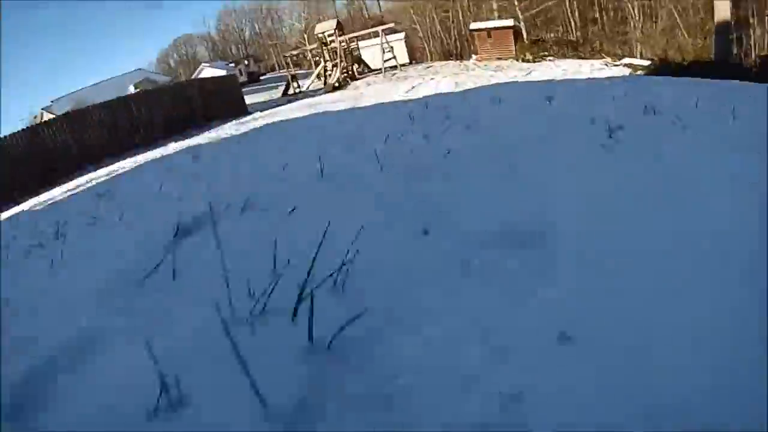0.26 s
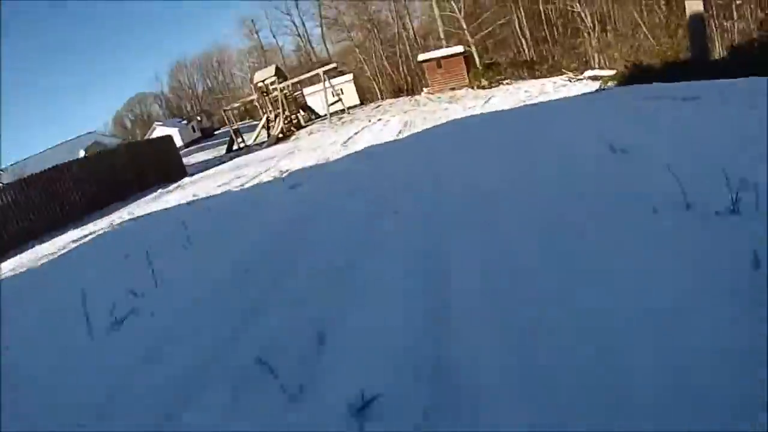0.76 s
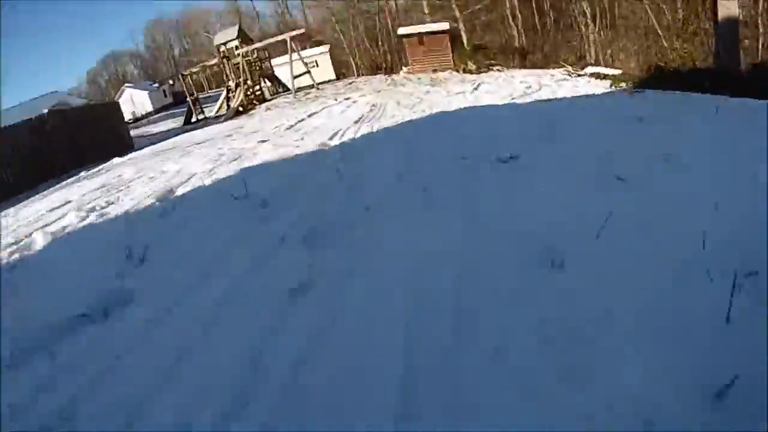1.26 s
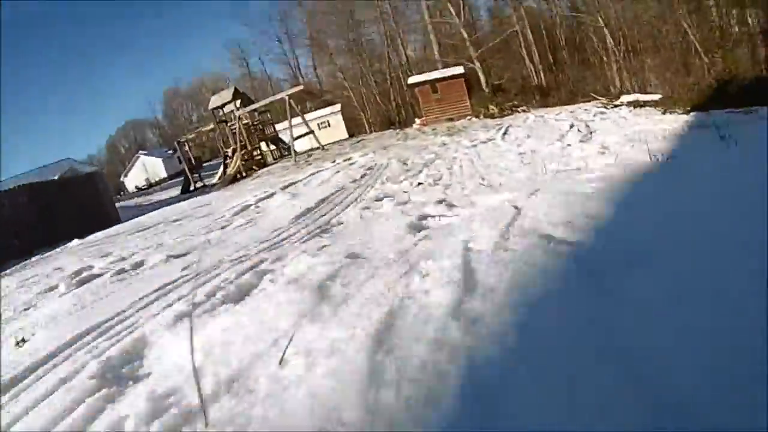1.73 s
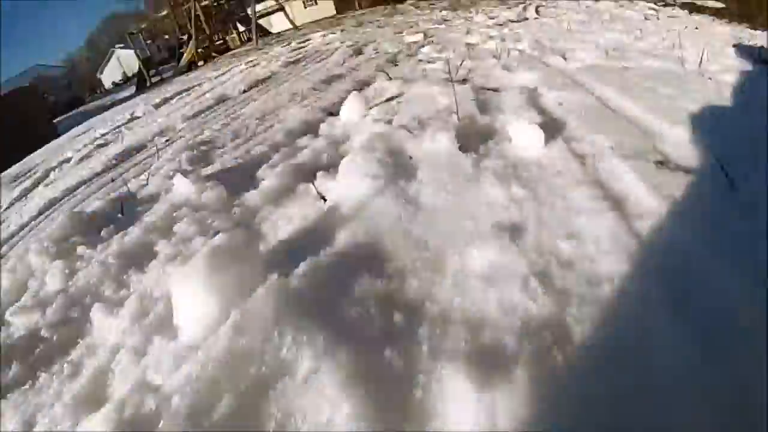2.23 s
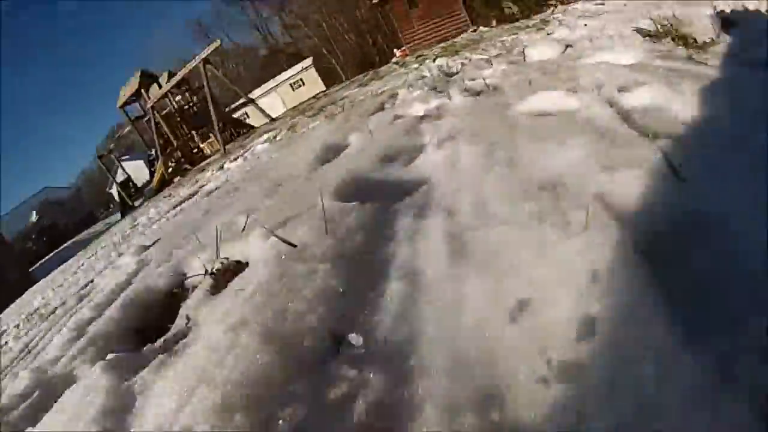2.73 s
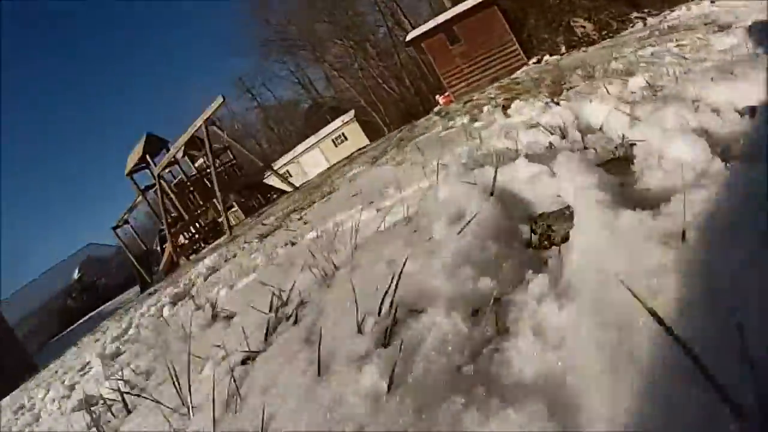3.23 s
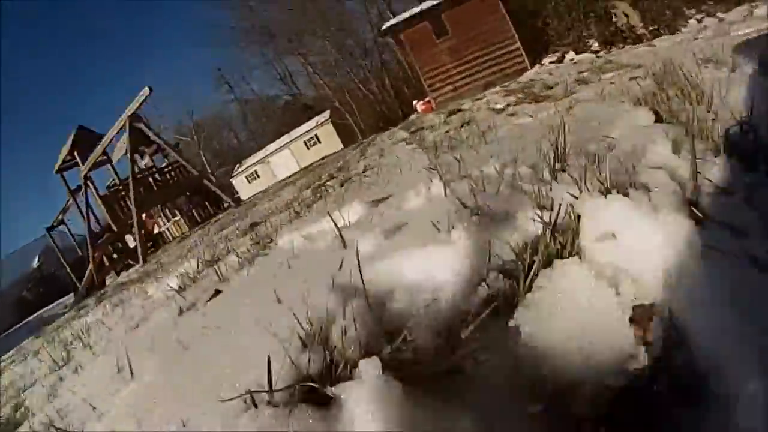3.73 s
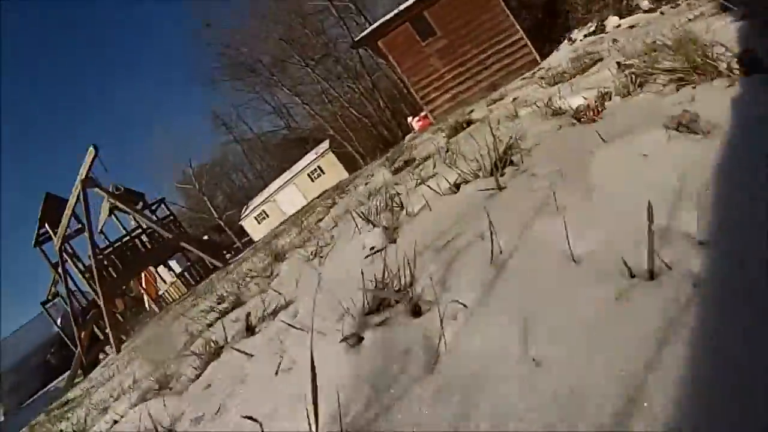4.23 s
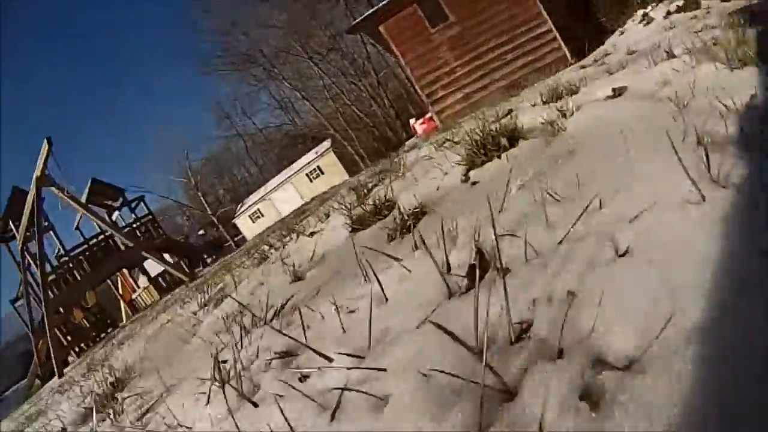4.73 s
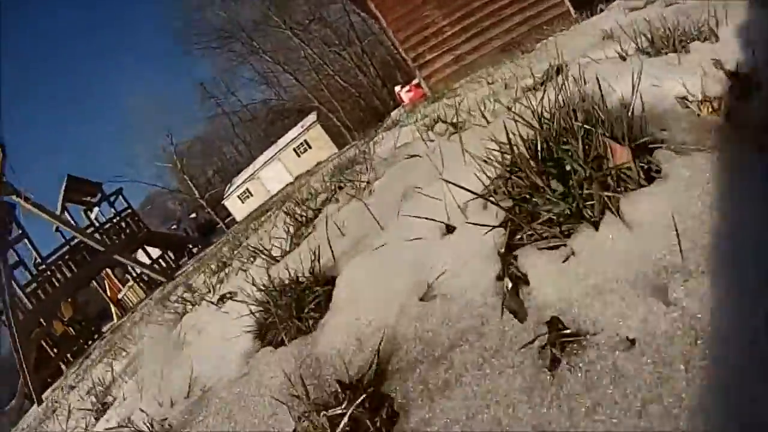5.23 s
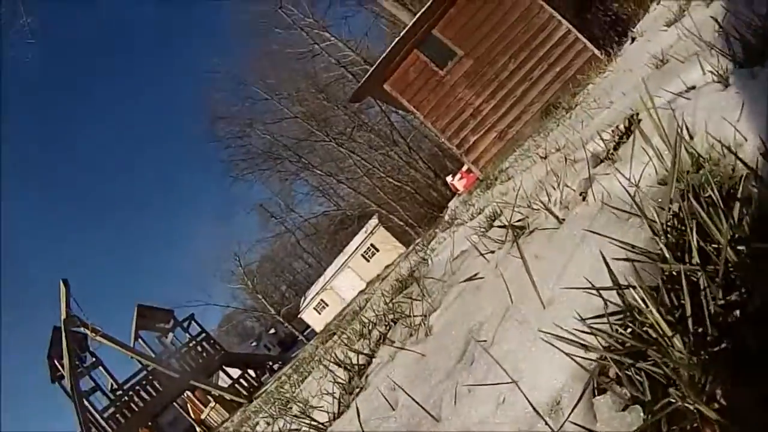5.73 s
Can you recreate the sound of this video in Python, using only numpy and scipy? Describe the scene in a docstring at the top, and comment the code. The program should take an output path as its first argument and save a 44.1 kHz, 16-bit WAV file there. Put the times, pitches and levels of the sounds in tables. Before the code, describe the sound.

A plastic sled grinds over crusty snow with gritty scraping, hollow knocks, crunches and low wind buffeting close to a riding microphone.

```python
"""A plastic sled hull grinds over crusty snow, with a microphone in a small case riding along.
Random ice-grain impacts, shaped by resonances and filters, make the scrape, hiss, drag and crunches.
Clicks sent through the ringing of the case make knocks and the ticks of thrown snow.
Damped swings make bumps; filtered jolts make the low rumble, and filtered noise makes the wind."""
import sys
import numpy as np
from scipy import signal
from scipy.fft import rfft, irfft
from scipy.io import wavfile
from scipy.ndimage import uniform_filter1d

SR = 44100
rng = np.random.default_rng(int(sys.argv[2]) if len(sys.argv) > 2 else 0)


def pcm_store(signal):
    """Save signal as 16-bit PCM."""
    levels = np.round(np.clip(np.atleast_2d(signal), -1, 1) * 32767)
    wavfile.write(sys.argv[1], SR, levels.astype(np.int16).T)


N = 263718
TIME = np.arange(N) / SR

# ringing of the case, lower notes: pitch_hz, width_hz, level_db
CASE_RINGING = [(1476, 270, -0.5), (1781, 320, -1.5), (2103, 270, -1), (2322, 410, -7.5), (2760, 410, -1.5),
                (2930, 270, -5)]
# ringing of the case, upper notes: pitch_hz, width_hz, level_db
UPPER_RINGING = [(3105, 146, 7.5), (3574, 133, 4), (3650, 1190, 2.5), (4920, 1000, -3.5), (5050, 470, -6),
                 (6420, 900, -2), (7650, 385, 1.5), (8110, 390, -0.5), (9070, 500, -5), (10630, 330, -5),
                 (11900, 900, -15)]
# tone colour of fine powder, also used for the fine top of ticks: pitch_hz, level_db
POWDER_COLOUR = [(4000, -37), (8000, -28), (10000, -11), (11300, 4), (12600, 6), (14000, 3), (15500, -5)]
# bumps that thump the hull: start_s, level_db (before the shares of push and swing), pitch_hz,
# swings (number until nearly damped)
HULL_BUMPS = [(0.452, -7, 122, 6.6), (.519, -3.5, 141, 3.7), (0.648, 1, 70, 1.5), (.878, -5, 83, 2.2),
              (1.084, -3.5, 94.5, 4.3), (1.118, -2, 79.5, 2.8), (1.16, -3, 105, 3.3), (1.272, -4, 120, 4.3),
              (1.486, 0, 61.3, 0.99), (1.586, -7, 66, 2), (1.798, 0.5, 98.5, 1.7), (2.091, 0.5, 93, 1.7),
              (2.098, -8, 69.4, 1.5), (2.331, -8.5, 124, 6.3), (3.56, -1, 50, 2.1), (4.587, 0, 68, 2),
              (4.617, 3.5, 114, 2), (4.642, -5, 82.5, 1.8), (4.99, -2, 60, 1.5), (5.042, -3.5, 56, 1.4),
              (5.276, -1, 113, 3.3)]


def from_db(db):
    """Turn decibels into a gain."""
    return 10 ** (np.asarray(db) / 20)


def rms_one(x):
    """Scale a signal to unit power."""
    return x / np.sqrt(np.mean(x ** 2) + 1e-20)


def in_time(rows):
    """Draw one curve per column by joining the timed points with straight lines."""
    s, *columns = np.transpose(rows)
    return [np.interp(TIME, s, column) for column in columns]


def drift(rate):
    """Wander smoothly and randomly with spread 1; a higher rate (per second) changes faster."""
    step = 20  # samples between the points of the slow curve
    warm_up = 2000
    r = np.exp(-2 * np.pi * rate * step / SR)
    noise = rng.standard_normal(N // step + warm_up + 2)
    slow = signal.lfilter([1], [1, -2 * r, r * r], noise)[warm_up:]
    return np.interp(np.arange(N) / step, np.arange(len(slow)), rms_one(slow))


def cut(x, hz, kind, order=2):
    """Keep what lies above ("high") or below ("low") a pitch, with a Butterworth filter."""
    sections = signal.butter(order, min(hz, .45 * SR), kind, fs=SR, output="sos")
    return signal.sosfilt(sections, x)


def colour(spectrum, size=8192):
    """Make the earliest-sounding (minimum-phase) impulse response with the given spectrum."""
    hz, db = np.transpose(spectrum)
    grid = np.maximum(np.arange(size // 2 + 1) * SR / size, 1)
    gain = from_db(np.interp(np.log(grid), np.log(hz), db))
    cepstrum = irfft(np.log(gain))
    # folding the second half onto the first leaves nothing before time zero
    cepstrum[1:size // 2] *= 2
    cepstrum[size // 2 + 1:] = 0
    return irfft(np.exp(rfft(cepstrum)))


def resonances(modes, size=2048):
    """Add up decaying ringing notes with alternating signs; wider notes die sooner."""
    out = np.zeros(size)
    for k, (hz, width, db) in enumerate(modes):
        r = np.exp(-np.pi * width / SR)
        poles = [1, -2 * r * np.cos(2 * np.pi * hz / SR), r * r]
        ring = signal.lfilter([1, 0, -1], poles, signal.unit_impulse(size))
        out += (-1) ** k * from_db(db) * (1 - r * r) / 2 * ring
    return out


def through(force, response):
    """Drive a body with a force; white noise keeps its power."""
    return signal.oaconvolve(force, response / np.linalg.norm(response))[:N]


def grains(per_s, spread_db):
    """Scatter tiny impacts of uneven size and either sign, at unit power."""
    sizes = from_db(spread_db * np.minimum(rng.exponential(1, N), 4))
    sizes = sizes * rng.choice([-1, 1], N)
    return rms_one(sizes * (rng.random(N) < per_s / SR))


def evened(x, span_s):
    """Hold the power steady over a span, keeping the faster grain."""
    power = uniform_filter1d(x * x, max(int(span_s * SR), 2))
    return x / np.sqrt(np.abs(power) + 1e-9)


def strikes(times, levels_db, response, rattle, rattle_s):
    """Strike a body with clicks that peak at the given levels, each with a fading noisy rattle."""
    t = np.arange(SR // 20) / SR
    force = np.zeros(N + SR)
    for s, db in zip(times, levels_db):
        at = int(s * SR)
        rattling = rattle * rng.standard_normal(len(t)) * np.exp(-t / rattle_s)
        force[at:at + len(t)] += from_db(db) * (rattling + (t == 0))
    return signal.oaconvolve(force[:N], response / np.abs(response).max())[:N]


def wandering(force, modes, wander_db):
    """Drive each mode now more, now less, as the contact moves over the hull."""
    out = np.zeros(N)
    for k, mode in enumerate(modes):
        ring = signal.oaconvolve(force, resonances([mode]))[:N]
        out += (-1) ** k * from_db(wander_db * drift(12.2)) * ring
    return out


def case_band(x):
    """Let through the steep-edged band of pitches that the case passes."""
    return cut(cut(x, 1726, "high", order=3), 2690, "low", order=6)


def swells(rows, edge_s):
    """Make each row rise, hold and fall; one curve per column after start and length."""
    out = 0
    for start, length, *heights in rows:
        inside = np.minimum(TIME - start, start + length - TIME)
        edge = max(min(edge_s, length / 2), .001)
        out = out + np.outer(heights, np.clip(inside / edge, 0, 1))
    return out


def ride():
    """Share the hull's pressure among the layers by ground, altered on mounds and lost in skips."""
    # how hard the hull bears on the snow: start_s, level_db
    pressure_points = [(0, -21.5), (.2, -23), (.32, -29), (.46, -24), (.94, -22), (1.02, -27), (2.16, -30),
                       (2.28, -25), (2.7, -19), (2.86, -26.5), (3.45, -24.5), (4.6, -23.5), (4.76, -30),
                       (5.22, -26.5), (5.38, -24.5), (5.66, -31), (5.75, -49.5), (5.98, -37)]
    # depth and firmness of the snow, levels relative to the pressure:
    # start_s, loose_hiss_db, ploughing_drag_db, ground_rumble_db
    ground_points = [(0, -20.5, -14, -2), (.75, -18, -13.5, -0.5), (1.15, -19.5, -10.5, 0.5),
                     (1.7, -15.5, -7.5, 6.5), (1.95, -22.5, -10.5, -12.5), (2.22, -12.5, -10.5, 7),
                     (2.6, -18, -15.5, -4), (2.95, -8, -9.5, 2), (3.55, -10.5, -6.5, 2.5),
                     (4.15, -11, -8.5, -3), (4.55, -6.5, -6, -0.5), (4.9, -10.5, -6.5, 3),
                     (5.35, -14.5, -9, -7.5), (5.95, -21.5, -12, -1.5)]
    # airflow over the microphone: start_s, level_db
    airflow_points = [(0, -16.5), (.3, -19.5), (.6, -17.5), (1.7, -19), (2.0, -34), (2.2, -21),
                      (2.9, -23.5), (3.4, -24), (3.7, -20), (4.1, -22.5), (4.55, -17.5), (4.85, -28.5),
                      (5.1, -21), (5.98, -30.5)]
    # the hull rides into a mound: start_s, length_s, scrape_change_db, drag_change_db, rumble_change_db
    mound_rows = [(.15, 0.054, 4.5, -1, 5.5), (.45, 0.17, 6, 2.5, 7.5), (.68, 0.036, 5.5, 4, 7),
                  (.815, 0.14, 1.5, 0, 4), (1.07, 0.1, 0, -3, 7), (1.24, 0.055, -4, -12, 5.5),
                  (1.575, .07, 4.5, 9, 4), (1.635, 0.098, 6.5, 4.5, 2), (1.755, 0.042, -2.5, 0, 5),
                  (1.865, 0.036, 6.5, -6, 3), (1.92, 0.042, 8, -4, 7), (2.18, 0.081, 1, 4, 3),
                  (2.26, 0.14, 3.5, 0.5, 2.5), (3.25, 0.14, 1, -0.5, 0.5), (3.41, 0.11, 5.5, 4, 2),
                  (3.9, 0.1, 3, 4.5, 2), (4.24, 0.045, 0.5, 4, 6), (4.57, 0.094, 1, 4.5, 9.5),
                  (4.975, 0.075, 4, 7, 6), (5.275, 0.047, 2, 1.5, -1)]
    # the hull goes light behind a crest: start_s, length_s, contact_loss_db
    skip_rows = [(.97, .09, 3), (1.335, 0.16, 8), (1.808, 0.037, 12), (1.96, 0.16, 3.5), (2.41, 0.067, 5),
                 (3.07, 0.072, 3), (4.08, .13, 2.5), (5.21, 0.057, 5.5)]
    # buffets of wind: start_s, length_s, rise_db
    gust_rows = [(2.075, 0.037, 22), (3.52, .13, 7.5), (4.22, 0.091, 7.5), (5.0, 0.11, 7),
                 (5.39, 0.068, 11)]
    pressure_db, = in_time(pressure_points)
    loose_db, packed_db, firm_db = in_time(ground_points)
    air_db, = in_time(airflow_points)
    bite_db, plough_db, heave_db = swells(mound_rows, edge_s=0.015)
    lift_db, = swells(skip_rows, edge_s=0.028)
    gust_db, = swells(gust_rows, edge_s=0.034)
    scrape_db = pressure_db + bite_db - lift_db
    hiss_db = pressure_db + loose_db + 0.9 * bite_db - 0.77 * lift_db
    drag_db = pressure_db + packed_db + plough_db - .9 * lift_db
    rumble_db = pressure_db + firm_db + heave_db - 1.37 * lift_db
    wind_db = air_db + gust_db - 1.4 * lift_db
    return scrape_db, hiss_db, drag_db, rumble_db, wind_db


def wind(wind_db):
    """Buffet the microphone with low-pitched noise whose strength wanders."""
    # tone colour of the wind: pitch_hz, level_db
    wind_colour = [(8, -18), (22, 5.5), (40, 5.5), (65, 2), (90, -5.5), (140, -28), (400, -36),
                   (1500, -79.5)]
    air = evened(through(rng.standard_normal(N), colour(wind_colour)), 0.073)
    return air * from_db(wind_db + 2.4 * drift(5.4))


def shudder():
    """Give the strength of the shaking that dies away after each bump."""
    decay_s = 0.013
    kicks = np.zeros(N)
    for s, db, *_ in HULL_BUMPS:
        kicks[int(s * SR)] = from_db(db - 14.5)
    return signal.lfilter([1], [1, -np.exp(-1 / (decay_s * SR))], kicks + 1e-18)


def shaking(rumble_db):
    """Rumble the hull with many small ground jolts, plus a clatter that follows the hardness."""
    # tone colour of the rumble: pitch_hz, level_db
    rumble_colour = [(40, -23), (75, -4), (110, 6), (145, 1.5), (200, -5), (260, -8.5), (350, -17.5),
                     (500, -34), (900, -53.5), (2500, -98)]
    # tone colour of the hull clattering over hard ground: pitch_hz, level_db
    clatter_colour = [(130, -22.5), (240, 3), (320, 2.5), (450, -8), (600, -13), (1000, -30.5),
                      (2500, -59.5)]
    # hardness of the ground: start_s, clatter_over_rumble_db
    hardness_points = [(0, -8.5), (.6, -10.5), (1.1, -13.5), (1.7, -11.5), (2.3, -15), (3, -15), (4.6, -15),
                       (5.5, -12)]
    hardness_db, = in_time(hardness_points)
    rumble = evened(through(grains(per_s=450, spread_db=4), colour(rumble_colour)), 0.0693)
    clatter = evened(through(grains(per_s=400, spread_db=3.0), colour(clatter_colour)), 0.088)
    strength = np.hypot(from_db(rumble_db - 0.5 + 2.1 * drift(15)), shudder())
    return (rumble + clatter * from_db(hardness_db)) * strength


def bumps():
    """Push the hull with brief contacts; damped by snow and rider, it swings back a few times."""
    out = np.zeros(N)
    contact_s = 0.0022  # time for the push to reach its peak
    for s, db, hz, swings in HULL_BUMPS:
        at = int(s * SR)
        t = TIME[:min(SR // 5, N - at)]
        contact = t / contact_s * np.exp(1 - t / contact_s)
        age = 5.86 * hz * t / max(swings, .5)
        swing = -np.sin(2 * np.pi * hz * t) * age * np.exp(1 - age)
        out[at:at + len(t)] += from_db(db) * (from_db(-7.5) * contact + from_db(-3.5) * swing)
    return cut(out, 950, "low")


def ticks(snap):
    """Click the case with thrown crumbs, too light to ring its low modes."""
    # single crumbs and stalks: start_s, level_db (before a small trim), fine_top_db (over the click)
    tick_rows = [(1.2637, -16, -3), (1.4872, -27, 12), (2.0928, -23.5, -22), (2.711, -17, -23),
                 (2.9884, -15, -16), (3.039, -19.5, 0), (3.0884, -21, 6), (4.6253, -12.5, -22),
                 (5.6706, -24, -27), (5.6775, -20, -23), (5.685, -24, -30), (5.7287, -22, -23),
                 (5.874, -32.5, -35), (5.9524, -37, -25)]
    # nine crumbs thrown up by the nose, sparser and weaker as they fall
    shower_start_s, shower_length_s = 2.98, .3
    turn, size, top = rng.random(size=(9, 3)).T
    fallen = ((np.arange(len(turn)) + turn) / len(turn)) ** 1.6
    shower_s = shower_start_s + shower_length_s * fallen
    shower_db = -13 - 13 * fallen - 4 * size
    shower_top_db = -4 + 12 * (top - .5)
    shower = np.column_stack([shower_s, shower_db, shower_top_db])
    s, db, top_db = np.vstack([tick_rows, shower]).T
    click = strikes(s, db + .5, snap, rattle=0.057, rattle_s=0.0047)
    fine_top = strikes(s, db + top_db - 1.0, colour(POWDER_COLOUR), rattle=0.19, rattle_s=0.00069)
    return click + fine_top


def knocks(case, snap, hollow):
    """Ring the case with hard contacts that also sound a hollow body and a sharp edge."""
    # hard knocks: start_s, level_db, hollow_db and edge_db (both over level_db); all trimmed below
    knock_rows = [(0.365, -15, -22, -18), (0.468, -6.5, -29, -19), (.847, -6, -5.5, -17),
                  (.897, -10, -22, -30), (.930, -8.5, -17, -30), (1.063, -14, -2.5, -34),
                  (1.149, -6.5, -17, -22), (1.26, -10, -11.5, -24), (1.328, -13, -13, -22),
                  (1.409, -12, -19, -35), (1.463, -19, -12, -32), (1.488, -12, -9, -0.5),
                  (1.512, -1, -27, -15), (1.649, -9.5, -16, -24), (1.846, -9.5, -16, -13),
                  (2.1, -4, -13, -19), (2.119, -11.5, -12, -13), (2.978, -6.5, -20, -13),
                  (3.243, -11, -18, -25), (4.626, -2, -28, -11), (4.648, -13.5, -26, -19),
                  (5.276, -6.5, -3, -30), (5.459, -11.5, -24, -16), (5.730, -25, -17, -15),
                  (5.873, -28.5, -7, -17)]
    s, db, hollow_db, edge_db = np.transpose(knock_rows)
    ring = strikes(s, db + 0.11, case, rattle=0.043, rattle_s=0.0029)
    body = strikes(s, db + hollow_db + .5, hollow, rattle=0.014, rattle_s=0.0025)
    edge = strikes(s, db + edge_db - 2, snap, rattle=0.38, rattle_s=0.00062)
    return ring + body + edge


def sprays():
    """Sizzle with gritty ice grains shaved off by the nose, each spray in a narrow band."""
    # sprays: start_s, length_s, level_db (before the final filters), pitch_hz
    spray_rows = [(0.138, .09, -39, 4400), (2.257, 0.076, -33, 4400), (2.32, 0.13, -40, 5600),
                  (2.46, 0.36, -45.5, 5500), (5.28, 0.3, -44.5, 5300)]
    out = np.zeros(N)
    sizzle = grains(per_s=3400, spread_db=1.0) * from_db(3.0 * drift(50))
    for start, length, db, hz in spray_rows:
        flow, = swells([(start, length, from_db(db))], edge_s=0.021)
        band = through(sizzle, resonances([(hz, 280, 0)]))  # 280 Hz wide
        out += flow * evened(band, .06)
    return cut(cut(out, 2600, "high"), 5400, "low")


def crunches(case, upper, hollow):
    """Crush lumps in short swells of cracking grains, each with a rasp at its own pitch."""
    # lumps of crust crushed under the hull: start_s, level_db (before the mix below), length_s
    crunch_rows = [(.019, -14, 0.0091), (.045, -5.5, .011), (0.375, -11.5, 0.048), (0.52, 2.5, 0.008),
                   (0.529, -2, 0.014), (.541, -1, 0.013), (0.625, -5.5, 0.017), (.689, -5, .021),
                   (0.843, -3, 0.03), (0.895, -4, 0.016), (0.924, -5, 0.021), (.949, -1, 0.0092),
                   (1.072, -13, 0.024), (1.116, -5.5, 0.019), (1.149, -9, 0.023), (1.198, -11, 0.021),
                   (1.249, -10, 0.028), (1.371, -11.5, 0.021), (1.402, -10.5, 0.014), (1.58, -12.5, 0.025),
                   (1.649, -4, 0.019), (1.659, -0.5, .009), (1.678, -4, 0.012), (1.889, -10.5, 0.012),
                   (1.926, -9.5, 0.031), (2.27, -12, .05), (2.386, -6, 0.0079), (2.742, -10.5, 0.049),
                   (3.541, -7.5, 0.031), (3.949, -10, 0.013), (4.606, -6, 0.015), (5.377, -9, 0.052)]
    rasp_hz, scatter_octaves = 2045, .13  # middle pitch of the rasps and their random spread
    cracking = evened(grains(per_s=4400, spread_db=4), 0.0054)
    pressure, rasp = np.zeros(N), np.zeros(N)
    for s, db, length in crunch_rows:
        hz = rasp_hz * 2 ** (scatter_octaves * rng.standard_normal())
        at = int(s * SR)
        span = slice(at, min(at + SR // 8, N))
        age = (TIME[span] - TIME[span][0]) / max(length, .002)
        swell = from_db(db) * np.sin(np.pi * np.minimum(age, 1) ** 0.34)  # quick rise, slower fall
        noise = rng.standard_normal(len(age))
        ring = signal.fftconvolve(noise, resonances([(hz, 200, 0)]))[:len(age)]
        pressure[span] += swell
        rasp[span] += swell * evened(ring, 0.035)
    grit = from_db(-22.0) * evened(through(cracking, case), 0.0087)
    grit += from_db(-26.5) * through(cracking, hollow)
    grit += from_db(-40.5) * through(cracking, upper)
    return pressure * grit + from_db(-11) * case_band(rasp)


def sliding(scrape_db, hiss_db, drag_db):
    """Break ice grains under a hull that grips and lets go, so all bands flutter together."""
    # crust on the snow: start_s, unevenness_db (scaled into the flutter below),
    # powder_over_hiss_db, rasp_over_scrape_db
    snow_points = [(0, 1, -9, -10), (.9, 2.5, -9.5, -9), (1.4, 3.5, -12, 0.5), (1.67, 1, -9, -10),
                   (2.05, 2.5, -14, -3), (2.38, 2, -14, -3), (2.66, 2, -14, 1), (2.8, 2, -13, -26),
                   (4.4, 1, -13.5, -11), (5.22, 0, -18, -10), (5.32, -0.7, -18, -5), (5.95, 4, -10, -3.5)]
    # ringing of the plastic hull where it rubs on hard crust: pitch_hz, width_hz, level_db
    hull_ringing = [(2203, 93, 7), (2390, 133, 3.5), (4230, 400, -12), (5370, 1100, -19.5),
                    (6290, 270, -13)]
    # tone colour of the ploughing drag: pitch_hz, level_db
    drag_colour = [(250, -7), (400, -4), (530, -17), (720, 0), (900, 2), (1100, -2.5), (1300, -14),
                   (1800, -4), (3000, -47)]
    uneven_db, powder_db, rasp_db = in_time(snow_points)
    grip_db = uneven_db * (1.1 * drift(37) + 0.21 * drift(240))

    crust = grains(per_s=6000, spread_db=2.0) * from_db(grip_db)
    scrape = evened(case_band(wandering(crust, CASE_RINGING, wander_db=1.5)), 0.091)
    # on hard crust the hull sticks and slips, and rings
    slips = grains(per_s=4000, spread_db=5.0) * from_db(0.97 * grip_db)
    rasp = evened(through(slips, resonances(hull_ringing)), 0.2) * from_db(rasp_db)
    # sharing the power keeps the level steady when the rasp grows
    grinding = (scrape + rasp) / np.sqrt(1 + from_db(rasp_db) ** 2) * from_db(scrape_db - 3.5)

    ploughed = grains(per_s=4000, spread_db=3.0) * from_db(grip_db)
    drag = evened(through(ploughed, colour(drag_colour)), 0.106) * from_db(drag_db - 3.0)

    loose = grains(per_s=26000, spread_db=2.5) * from_db(1.04 * grip_db)
    hiss = evened(cut(wandering(loose, UPPER_RINGING, wander_db=1.5), 2150, "high", order=3), 0.13)
    fine = grains(per_s=20000, spread_db=7.0) * from_db(0.55 * grip_db)
    powder = evened(through(fine, colour(POWDER_COLOUR)), 0.15)
    spilling = (hiss + powder * from_db(powder_db)) * from_db(hiss_db - 2.42)
    return grinding + drag + spilling


def scene():
    """Add all the layers, from the wind to the sliding hull, into one channel."""
    # hollow body of the hull when it is struck: pitch_hz, level_db
    thud_colour = [(120, -9), (280, -3.5), (480, -1), (700, 5.5), (950, 2), (1300, -10.5), (1800, -27),
                   (3000, -40)]
    # sharp, bright sound of knocks and ticks: pitch_hz, level_db
    snap_colour = [(1500, -51), (3400, 5.5), (4300, 6.5), (5000, 0.5), (6200, 10.5), (7000, 2), (7900, 4),
                   (8700, -7), (9200, -2.5), (11000, -11), (16000, -22)]
    case = case_band(resonances(CASE_RINGING))
    upper = resonances(UPPER_RINGING)
    hollow, snap = colour(thud_colour), colour(snap_colour)
    scrape_db, hiss_db, drag_db, rumble_db, wind_db = ride()
    low = wind(wind_db) + shaking(rumble_db) + bumps()
    hits = ticks(snap) + knocks(case, snap, hollow)
    snow = sprays() + crunches(case, upper, hollow) + sliding(scrape_db, hiss_db, drag_db)
    return (low + hits + snow)[None]


def record(dry):
    """Let static pressure leak away, round the loudest peaks and cut the top of the treble."""
    pressure = cut(dry, 4.9, "high", order=1)
    rounded = pressure / (1 + (pressure / .95) ** 6) ** (1 / 6)
    treble_cut = signal.ellip(10, .1, 90, 15700, fs=SR, output="sos")  # steep, at 15700 Hz
    return signal.sosfilt(treble_cut, rounded)


dry = scene()
out = record(dry)
pcm_store(out)
```